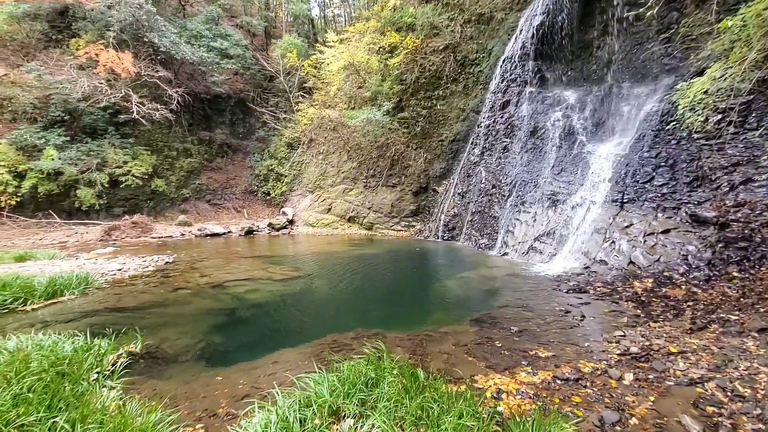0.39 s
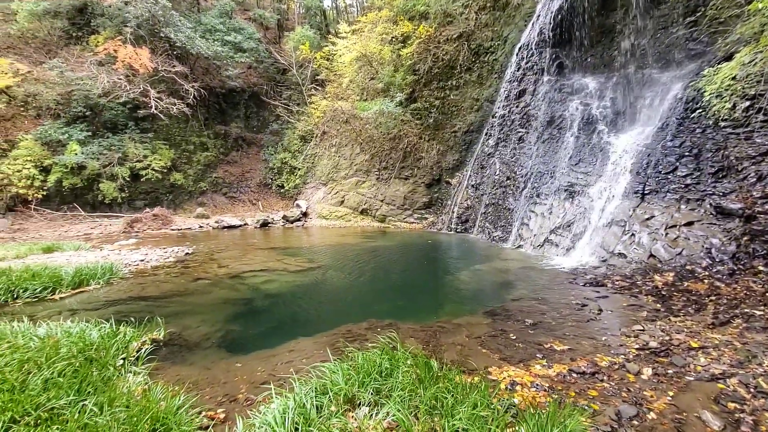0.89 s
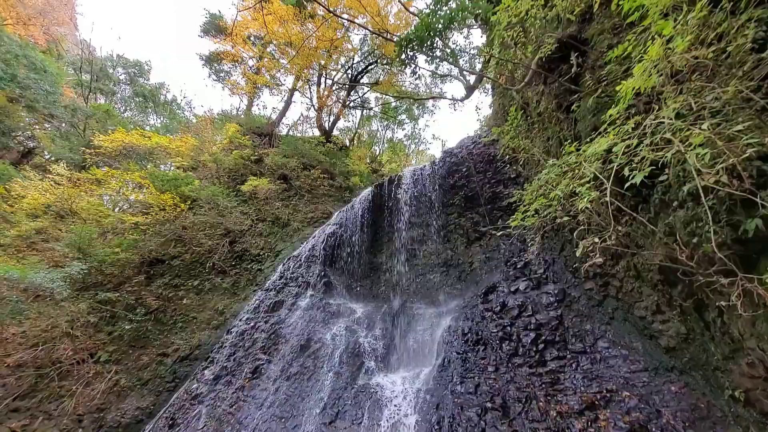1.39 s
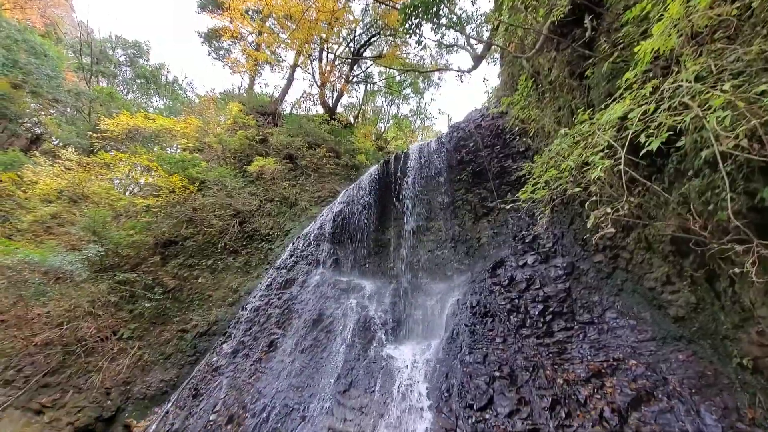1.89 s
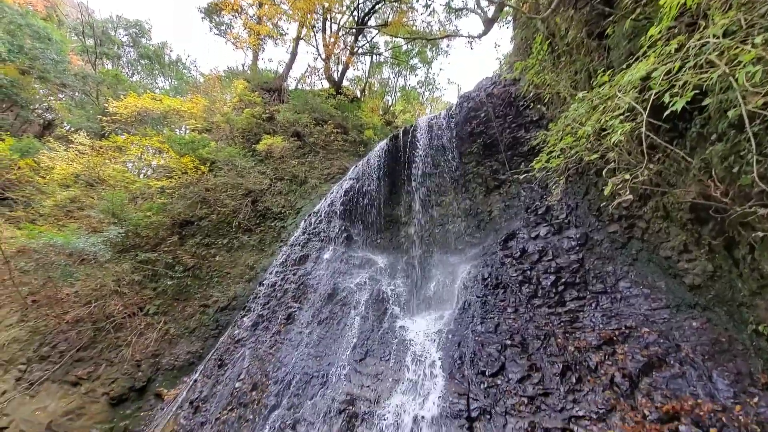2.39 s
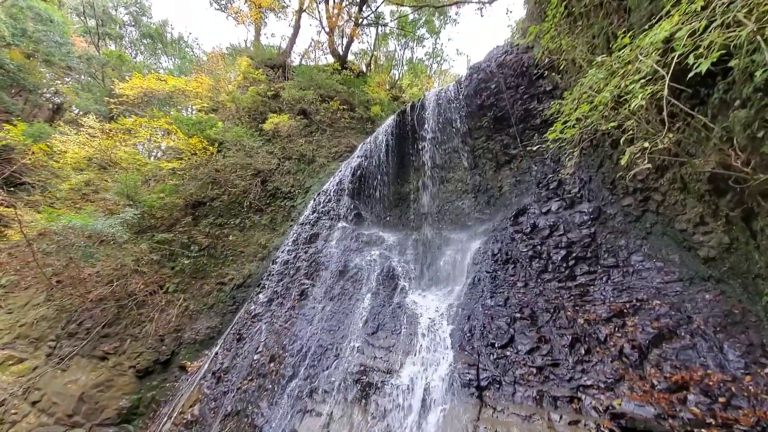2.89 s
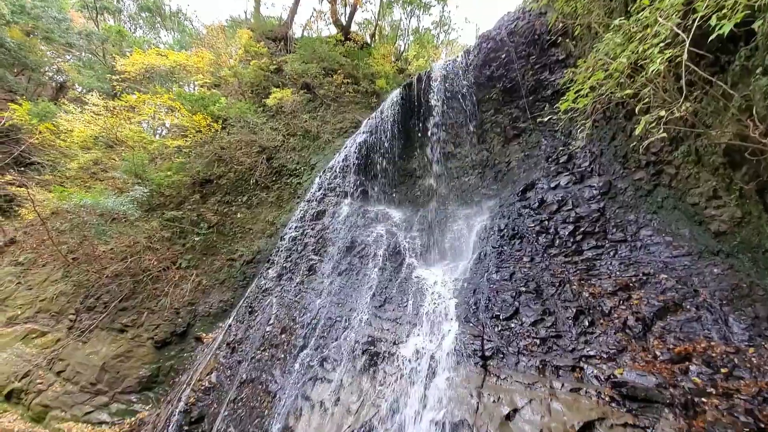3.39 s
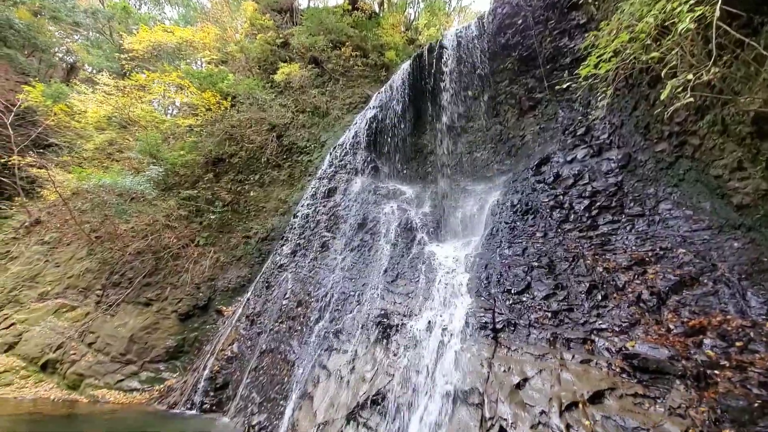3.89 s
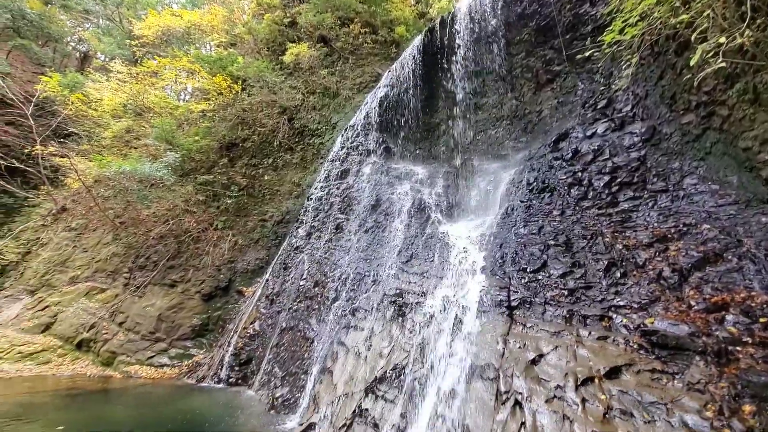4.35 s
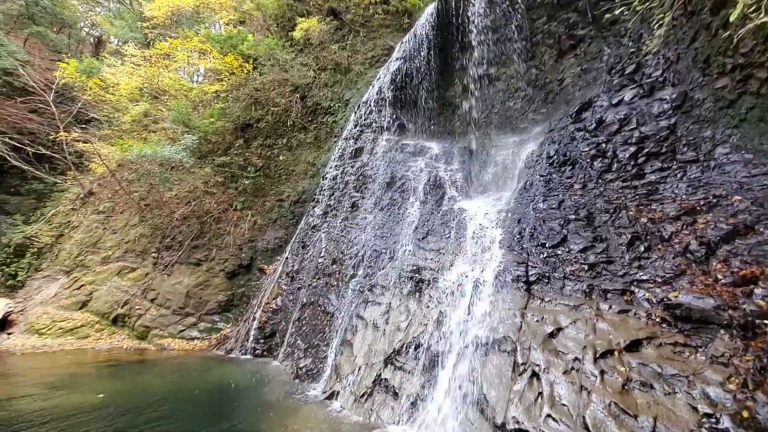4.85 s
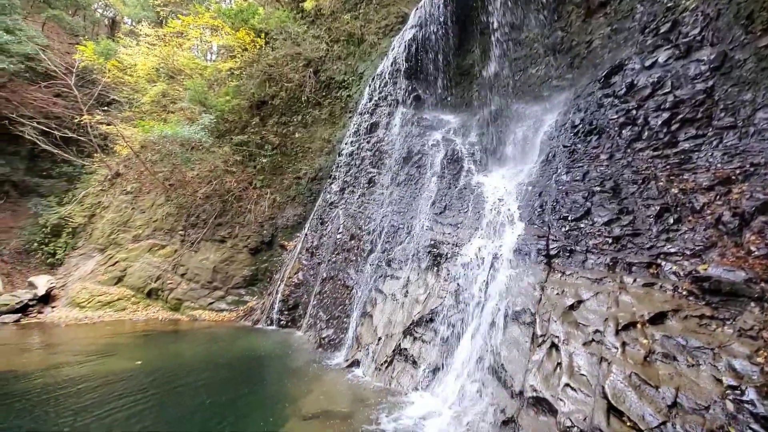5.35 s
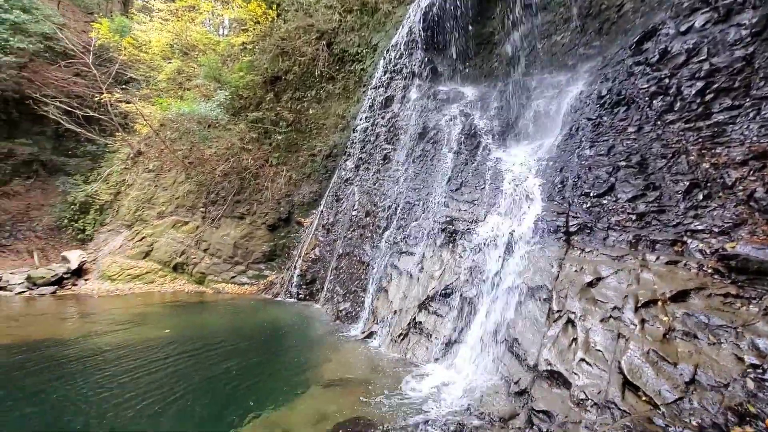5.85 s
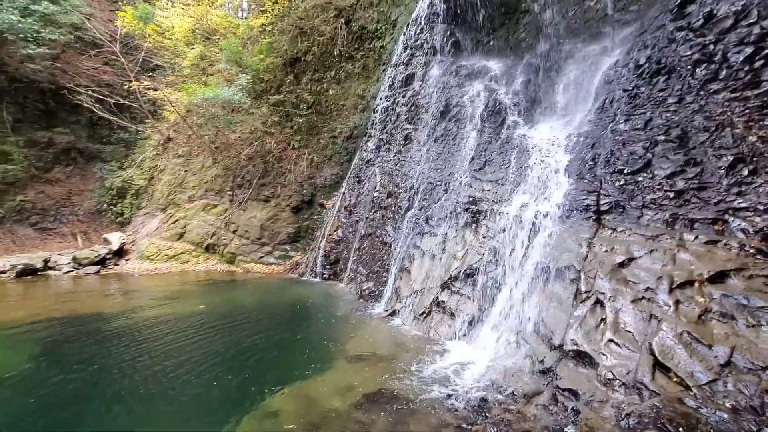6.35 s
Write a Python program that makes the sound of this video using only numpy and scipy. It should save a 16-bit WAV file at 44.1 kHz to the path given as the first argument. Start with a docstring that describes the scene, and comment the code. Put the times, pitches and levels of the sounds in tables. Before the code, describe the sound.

A woodland waterfall rushes steadily into a pool with light wind bumps on the microphone, then cuts to a closer, brighter, fuller rush.

```python
"""Woodland waterfall from two stands

A waterfall runs down a rock face into a pool, heard on a pair of microphone ports: first from across
the pool, where gusts thump the ports, then, after a splice, from close below, while the microphone
slowly tilts down from lip to plunge and the fall drifts to the right. The rush is spray noise and
rising bubble notes, patchy and flickering, with dull slaps below; gusts are rows of short low swings.
"""
import sys
import numpy as np
from scipy import signal
from scipy.io import wavfile
from scipy.ndimage import uniform_filter1d

SR = 44100
rng = np.random.default_rng(int(sys.argv[2]) if len(sys.argv) > 2 else 0)


def invert_db(level):
    """Linear amplitude ratio for a level in decibels (20 dB per decade), elementwise."""
    return 10 ** (np.asarray(level, dtype=float) / 20)


def master(y):
    """Save y as 16-bit WAV."""
    cut = np.clip(np.atleast_2d(y).T, -1, 1)
    pcm = np.round(cut * 32767)  # scale
    wavfile.write(sys.argv[1], SR, pcm.astype(np.int16))


N = 286209
HOP, LONG_HOP = 128, 512  # samples between spectra: short for texture, long to keep the bass slope


def evened(x, axis=None):
    """Scales to rms 1."""
    return x / np.sqrt(np.mean(abs(x) ** 2, axis=axis, keepdims=True) + 1e-20)


def read(table, hz):
    """Reads the columns of a table along a log-frequency axis."""
    f, *columns = np.transpose(table)
    return np.array([np.interp(np.log(hz + 1), np.log(f + 1), c) for c in columns])


def bins_hz(hop):
    """Frequencies of the short-time spectra, as a column."""
    return np.fft.rfftfreq(4 * hop, 1 / SR)[:, None]


def frames_of(x, hop):
    """Short-time spectra, bins x frames."""
    return signal.stft(x, nperseg=4 * hop, noverlap=3 * hop)[2]


def sound_of(z, hop):
    """Back from short-time spectra to samples."""
    return signal.istft(z, nperseg=4 * hop, noverlap=3 * hop)[1][..., :N]


def uneven_sizes(draws, spread_db):
    """Gains from 0 dB up, larger ones ever rarer, capped at three spreads."""
    return invert_db(spread_db * np.minimum(-np.log(1 - draws), 3))


def bubbles(per_s, cycles, spread_db, count=24):
    """Countless short rising bubble notes of uneven size, flattened to an even spectrum."""
    out = np.zeros(N)
    for hz in np.geomspace(150, 15000, count):
        u = np.arange(int(3 * cycles * SR / hz)) * hz / SR / cycles
        ring = np.sin(2 * np.pi * cycles * u * (1 + 0.0613 * u))  # the pitch climbs as it rings
        note = ring * u * np.exp(-2 * u)
        chance, size = rng.random((2, N))
        # small bubbles are far more numerous; per_s is the rate at 3 kHz
        born = chance < per_s * hz / 3000 / SR
        strikes = born * uneven_sizes(size, spread_db)
        out += signal.oaconvolve(strikes, evened(note))[:N]
    return evened(frames_of(out, HOP), axis=1)


def slaps(per_s=60, spread_db=2.5):
    """Lumps of water slap the pool: sparse blows of uneven size and either sign, flat in spectrum."""
    # the placed slaps: t/s, level over the smallest random slap/dB
    big_slaps = [(.054, 7), (.149, 7), (.175, 11), (.208, 18.5), (.419, 13), (1.6, 12), (4.748, 16),
                 (4.865, 14)]
    chance, size, side = rng.random((3, N))
    blows = (chance < per_s / SR) * uneven_sizes(size, spread_db)
    for when, db in big_slaps:
        blows[round(when * SR)] = invert_db(db)
    return evened(frames_of(blows * np.sign(side - 0.5), HOP))


def water(bubbly, patchy_db, flicker_db):
    """Three streams of spray hiss and bubbles under one pattern of patches and wide flickers."""
    spray = evened(frames_of(rng.standard_normal((3, N)), HOP))
    froth = np.array([bubbles(per_s=500, cycles=9.74, spread_db=2.5) for _ in range(3)])
    field = rng.standard_normal(spray.shape[1:])
    patches = uniform_filter1d(uniform_filter1d(field, size=7, axis=0), size=13, axis=1)
    flicker = uniform_filter1d(uniform_filter1d(field[::-1], size=90, axis=0), size=10, axis=1)
    swell_db = patchy_db * evened(patches) + flicker_db * evened(flicker)
    z = (np.sqrt(1 - bubbly) * spray + np.sqrt(bubbly) * froth) * invert_db(swell_db)
    # a dull knock: slaps take up to about 13 % of the shared stream's power, most near 360 Hz
    hz = bins_hz(HOP)
    share = 0.21 * np.exp(-(hz / 750) ** 2 - (170 / (hz + 1)) ** 2)
    z[0] = np.sqrt(1 - share) * z[0] + np.sqrt(share) * slaps()
    return evened(sound_of(z, HOP))


def heard(streams, turn_s, lags_ms, first, last, alike, bend):
    """Colours the streams for one stand; the shared stream reaches the left port late."""
    # resonances of the port openings: f/Hz, width/Hz, left level/dB, right level/dB
    port_peaks = [(4750, 740, -1.3, 4.5), (7550, 450, -1, 2), (12130, 610, 0.5, 3.5)]
    # placed chance fluctuations of the rush, short rises and dips in level: t/s, centre f/Hz, level/dB
    fluctuations = [(2.03, 2700, 1.5), (2.545, 3200, 3.5), (2.72, 2600, -4), (4.05, 2500, -2),
                    (5.308, 2400, 3), (5.54, 4600, 0.5), (6.06, 2400, -1.5)]
    spread_s, spread_octaves = 0.036, 0.38
    hz = bins_hz(LONG_HOP)
    t = np.arange(streams.shape[2]) * LONG_HOP / SR
    start, end = turn_s
    tilt = np.clip((t - start) / (end - start), 0, 1)
    lag_ms = lags_ms[0] + (lags_ms[1] - lags_ms[0]) * tilt

    colour_db = (1 - tilt) * read(first, hz) + tilt * read(last, hz)
    for centre, breadth, *db in port_peaks:
        colour_db += np.reshape(db, (2, 1, 1)) * np.exp(-((hz - centre) / breadth) ** 2)
    for when, centre, db in fluctuations:
        octaves_off = np.log2((hz + 1) / centre)
        colour_db += db * np.exp(-((t - when) / spread_s) ** 2 - (octaves_off / spread_octaves) ** 2)

    late = np.exp(-1j * (2 * np.pi * hz * lag_ms * 1e-3 + bend))
    shared = np.sqrt(alike) * streams[0] * np.array([late, np.ones_like(late)])
    own = np.sqrt(1 - alike) * streams[1:]
    return sound_of((shared + own) * invert_db(colour_db), LONG_HOP)


def waterfall():
    """One body of water heard from two stands: the far stops at the splice, the close fades in."""
    # colour of the rush at each aim: f/Hz, left level/dB, right level/dB
    across_pool = [(50.0, -21, -18.5), (100.0, -29, -27), (202, -22, -21), (332, -23, -20), (503, -17, -14),
                   (704, -16.5, -15), (1200.0, -14.5, -12.5), (1700.0, -13.5, -9.5), (2300.0, -14.5, -9.5),
                   (3440, -10.5, -10), (6200.0, -18, -13.5), (8600.0, -20.5, -14), (10500.0, -19, -14.5),
                   (13400.0, -17.5, -15)]
    facing_lip = [(50.0, -28, -24), (100.0, -23.5, -22.5), (200.0, -20, -18.5), (326, -21, -18.7),
                  (475, -15, -14), (700.0, -14, -13), (1200.0, -11.5, -11), (1700.0, -12.0, -7),
                  (2180, -10, -5.5), (3350, -11.5, -6.5), (5970, -13, -12.5), (8600.0, -15.5, -11.5),
                  (10700, -14.5, -13), (13500, -14, -12)]
    facing_plunge = [(50.0, -26, -27), (100.0, -21.5, -19.5), (200.0, -19, -18), (322, -20.5, -18.5),
                     (470, -15, -13), (700.0, -14.5, -13), (1160, -10.5, -9.5), (1700.0, -13.5, -8),
                     (2170, -9.5, -6), (3400.0, -10.5, -7.5), (6200.0, -16, -11), (8600.0, -15.5, -12),
                     (10500.0, -13, -11.5), (13400.0, -15.5, -12)]
    # how alike the ports hear the rush: f/Hz, across the pool/0-1, close/0-1, close phase bend/rad
    likeness = [(30, .45, 0.6, 0), (100, 0.96, 0.94, 0.1), (250, 0.97, 0.95, -0.026),
                (700, 0.77, 0.84, 0.04), (1300, 0.82, 0.69, 0.68), (1750, 0.71, 0.32, 0.17),
                (2300, 0.4, 0.63, -0.82), (2980, 0.12, 0.2, 0.15), (3980, 0.13, 0.01, -2.6),
                (6000, 0.04, 0, -1.9)]
    splice_s, fade_s, creep_s = 1.4545, 0.014, 0.35
    streams = frames_of(water(bubbly=0.24, patchy_db=0.66, flicker_db=0.24), LONG_HOP)
    across, close, bend = read(likeness, bins_hz(LONG_HOP))
    far = heard(streams, (0, 1.4), (0.258, 0.33), across_pool, across_pool, across, 0)
    near = heard(streams, (2.3, 5.9), (0.01, 0.17), facing_lip, facing_plunge, close, bend)
    since = np.arange(N) / SR - splice_s
    fade_db = -12 * np.clip(1 - since / fade_s, 0, 1)
    creep_db = -0.9 * np.exp(-abs(since) / creep_s)  # then creeps up to full level
    return np.where(since < 0, far, near * invert_db(fade_db + creep_db))


def gusts(count=4):
    """Each gust strikes and sags: a row of large and small eddies, each briefly swinging one port."""
    # t/s, length/s, level/dB, port (0 left, 1 right)
    gust_list = [(.05, .04, -33, 0), (0.257, .06, -31, 1), (.29, .05, -31, 0), (1.3, .065, -19, 0),
                 (1.362, .09, -17, 0)]
    low_hz, high_hz, eddy_cycles, db_per_octave = 48, 140, 2.1, -3.5
    rise_s, sag_db = 0.0046, -13  # the sag is per gust length
    out, t = np.zeros((2, N)), np.arange(N) / SR
    for (start, length, level_db, port), draws in zip(gust_list, rng.random((len(gust_list), count, 3))):
        span = slice(round(start * SR), round((start + 2 * length) * SR))
        since, gust = t[span] - start, 0
        for k, (place, size, phase) in enumerate(draws):
            # large and small eddies alternate; small ones swing faster and weaker
            octaves = ((k % 2 + size) / 2) ** 2 * np.log2(high_hz / low_hz)
            centre_s = (k + place / 2) / count * length
            cycles = (since - centre_s) * low_hz * 2 ** octaves
            swing = np.exp(-(2 * cycles / eddy_cycles) ** 2) * np.cos(2 * np.pi * (cycles + phase))
            gust = gust + invert_db(db_per_octave * octaves) * swing
        strike = np.minimum(since / rise_s, 1)
        out[round(port), span] += strike * invert_db(level_db + sag_db * since / length) * gust
    return out


def scene():
    """Water and wind at the two ports."""
    return waterfall() + gusts()


def low_pass(x):
    """Removes everything above the highest recorded frequency."""
    return signal.sosfilt(signal.butter(12, 16820, fs=SR, output="sos"), x)


def record(dry):
    """A gentle cut below 33 Hz and a steep band limit at 15.5 kHz."""
    low_cut = signal.butter(2, 33, "high", fs=SR, output="sos")
    cut = signal.sosfiltfilt(low_cut, dry, padtype="even", padlen=SR // 2)
    edge = signal.firwin(1201, 15500, window=("kaiser", 9), fs=SR)
    return low_pass(signal.oaconvolve(cut, edge[None], "same"))


dry = scene()
out = record(dry)
master(out)
```